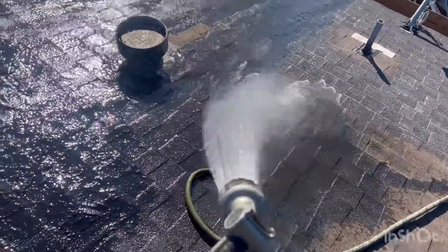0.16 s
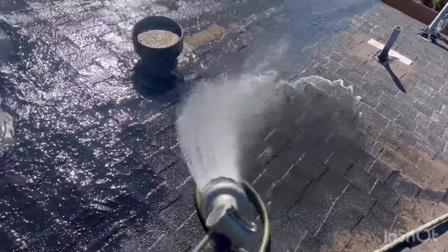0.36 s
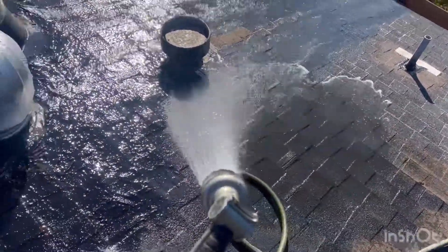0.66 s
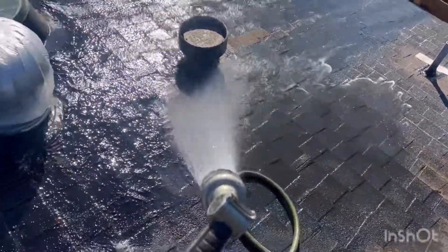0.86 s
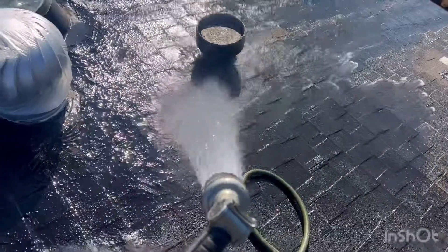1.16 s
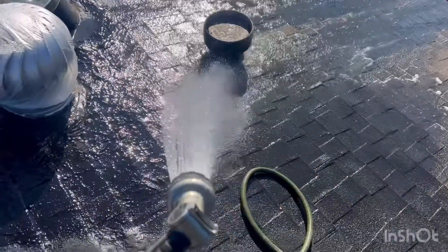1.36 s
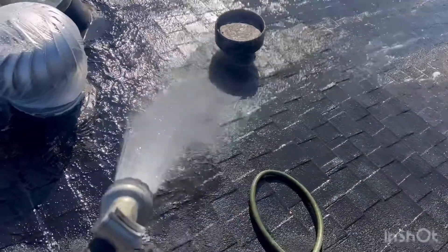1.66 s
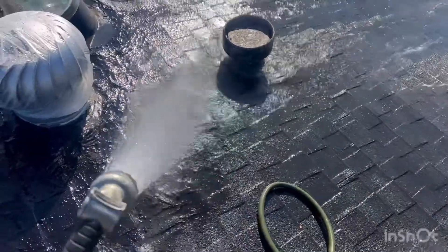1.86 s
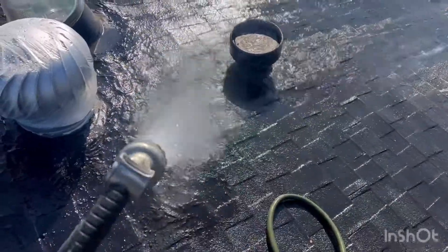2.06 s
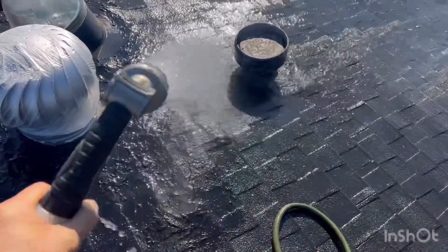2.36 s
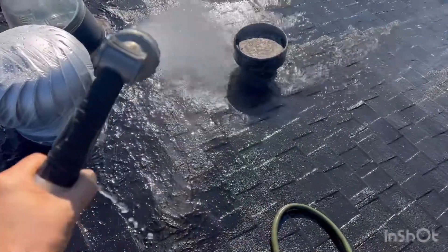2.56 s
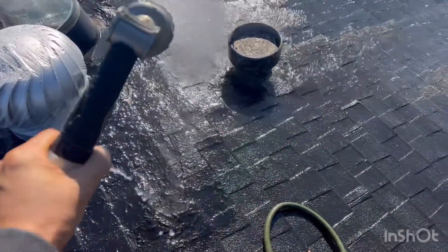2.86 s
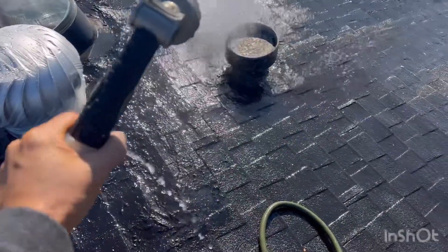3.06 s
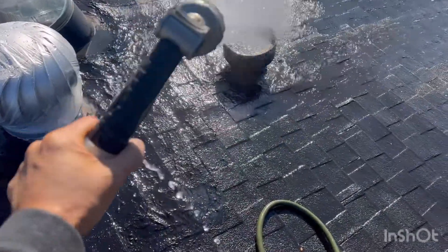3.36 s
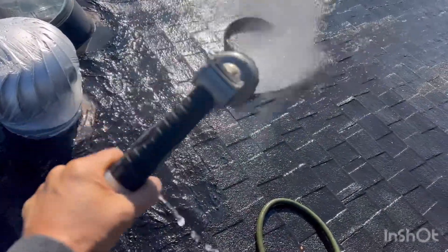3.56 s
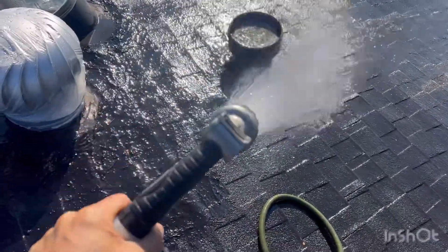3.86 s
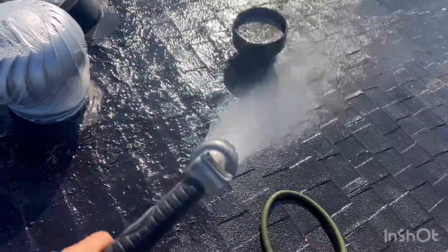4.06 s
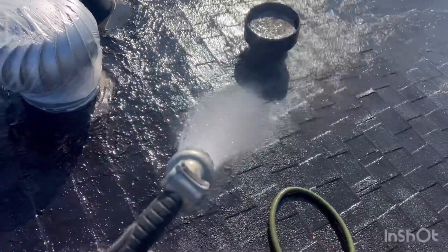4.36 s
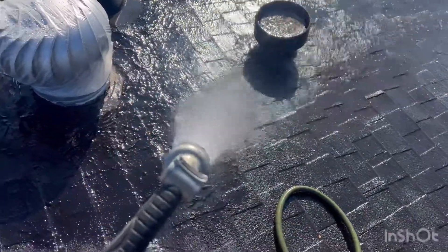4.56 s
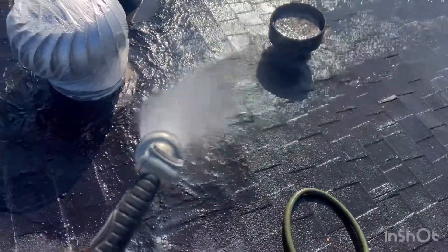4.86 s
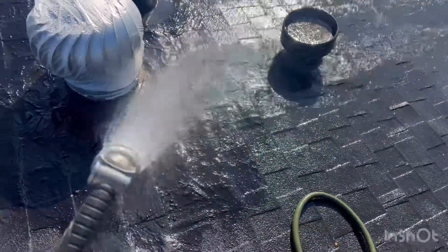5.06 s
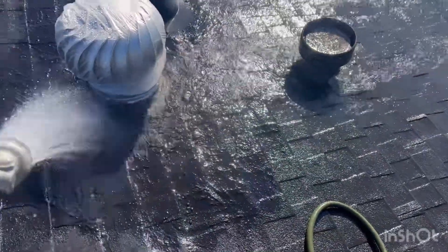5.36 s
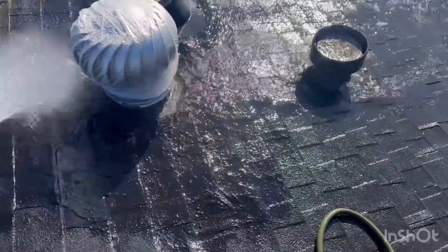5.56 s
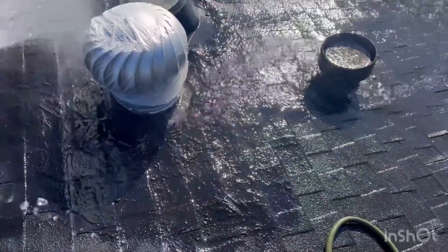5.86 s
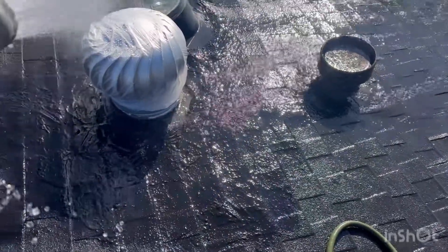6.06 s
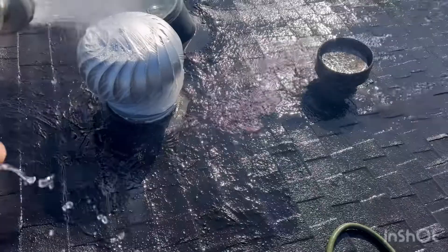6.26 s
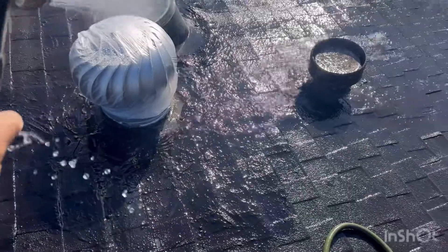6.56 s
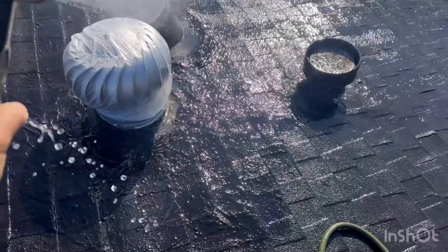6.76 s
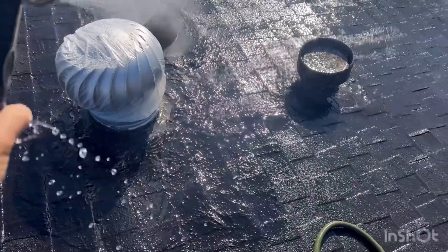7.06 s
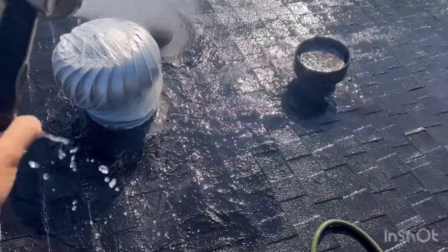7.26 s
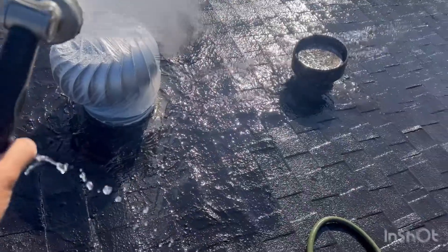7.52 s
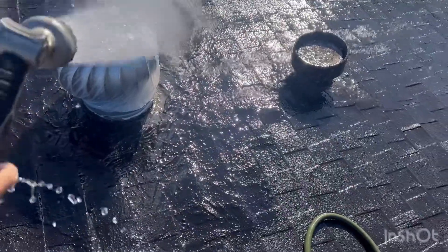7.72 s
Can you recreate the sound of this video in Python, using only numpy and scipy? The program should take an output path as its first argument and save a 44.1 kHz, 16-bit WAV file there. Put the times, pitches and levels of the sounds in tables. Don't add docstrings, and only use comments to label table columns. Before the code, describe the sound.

Continuous pressurized water hiss and splatter on wet roof shingles outdoors, with stray drop ticks, faint low hum, and a much louder close finish.

```python
import sys
import numpy as np
from scipy import signal
from scipy.fft import rfft, irfft
from scipy.io import wavfile
from scipy.ndimage import uniform_filter1d, map_coordinates

SR = 44100
rng = np.random.default_rng(int(sys.argv[2]) if len(sys.argv) > 2 else 0)


def log_audio(samples):
    frames = np.atleast_2d(samples).T
    limited = np.clip(frames, -1, 1)
    pcm = np.round(limited * 32767).astype(np.int16)
    wavfile.write(sys.argv[1], SR, pcm)


def gain_from_db(level_db):
    decades = np.asarray(level_db, float) / 20
    return 10 ** decades


N = 347949
FRAME, HOP = 1024, 256
HZ = np.arange(FRAME // 2 + 1) * SR / FRAME + 1

# t/s, share heard from the left (0-1), stretch of the port lead for spray ahead (1 =
SPRAY_AIM = [(0, 0, 0.24), (.3, 0, 1.17), (1.2, 0.08, 1.26), (2, 0.15, 1.3), (2.3, 0.54, 0.28),
             (2.55, 0.24, 0.29), (2.85, 0.5, 1.1), (3.2, 0.25, 0.64), (3.6, 0, 0.64), (4.05, 0.12, 0.12),
             (4.3, 0, 1), (4.8, 0.16, 1.45), (5.1, 0.4, 1.8), (5.4, 0.95, 2.3), (6.2, 0.85, 4.3),
             (7.3, 0.84, 2.2), (7.6, 1, 1.5), (7.89, 1, 1.4)]


def columns(table, s):
    t, *rest = np.transpose(table)
    return [np.interp(s, t, c) for c in rest]


def shape(table, hz):
    f, *rest = np.transpose(table)
    return [np.interp(np.log(hz), np.log(f), c) for c in rest]


def swells(rows, s):
    return sum(db * np.exp(-((s - at) / half_s) ** 2) for at, db, half_s in rows)


def walk(rate, size=N, step=1):
    hold = max(int(SR / step / rate), 1)
    levels = np.repeat(rng.standard_normal(size // hold + 1), hold)
    smooth = uniform_filter1d(uniform_filter1d(levels, hold), hold)[:size]
    return smooth / np.std(smooth)


def frames(x):
    return signal.stft(x, nperseg=FRAME, noverlap=FRAME - HOP)[2]


def colour(db):
    gain = gain_from_db(db)
    return (gain / np.sqrt(np.mean(gain ** 2)))[:, None]


def hose():
    # f/Hz, width/Hz, level/dB
    metal = [(630, 270, -5), (1557, 89, 7.5), (2080, 250, 5.5), (2240, 91, -5), (3310, 400, 2.5),
             (4000, 180, -2.5), (4600, 420, 2), (5930, 600, 4.5), (6350, 200, 1.5), (7460, 830, 3.5),
             (7950, 220, -2.5)]
    # f/Hz, left leads/rad, likeness (0-1), left minus right/dB
    ports_ahead = [(50, -0.7, 1, 10), (520, -1.14, 0.44, -1.5), (1310, 0.17, 0.9, -2),
                   (2330, 0.71, 0.64, -3.5), (2770, 1.87, 0.8, -1), (4000, 1.28, 0.57, 2),
                   (5000, 0.94, 0.8, 3), (6000, 1.05, 1, 2.5), (7300, 1.4, 0.62, 1)]
    # f/Hz, left leads/rad, likeness (0-1), left minus right/dB
    ports_left = [(50, 0, 1, 1.5), (600.2, 0.26, 0.93, 2), (1490, 1.43, 1, -1.5), (1950, 1.46, 1, -5),
                  (2600, 3, 0.69, 1.5), (2900, 3, 0.85, 7), (3200, 5.5, 0.39, 17), (4000, 8.5, 1, 5),
                  (4600, 5.5, 0.98, 18), (5300, 5.5, 0.94, 13), (6300, 5, 0.99, 0.5), (7440, 7, 0.8, 1.5)]
    # t/s, stretch of the port lag to the left (1 = none)
    twists = [(4.8, .85), (5.25, 1), (5.5, 1.45), (6.1, 1.4), (6.4, 1.05), (7, 1.02), (7.3, .98), (7.89, 1)]
    ahead = drops(1400, 1.0, 0.31)
    left = drops(1500, 1.5, 0.18)
    tick = ticks()
    count = tick.shape[1]
    s = np.arange(count) * HOP / SR
    gain = spray_gain(count)
    aim, turn = columns(SPRAY_AIM, s)
    aim = np.clip(aim, 0, 1)
    twist = columns(twists, s)[0]
    metal_db = sum(db / (1 + ((HZ - hz) / width * 2) ** 2) for hz, width, db in metal)
    ahead = gain * np.sqrt(1 - aim) * ahead
    left = gain * np.sqrt(aim) * left * gain_from_db(metal_db - 1.5)[:, None]
    ahead[0] += tick
    heard = ports(ports_ahead, *ahead, turn, 6000)
    heard = heard + ports(ports_left, *left, twist, 4000, turns=1)
    return signal.istft(heard, nperseg=FRAME, noverlap=FRAME - HOP)[1][:, :N]


def drops(rate, scatter_db, share):
    size = gain_from_db(np.minimum(scatter_db * rng.exponential(size=N), 9.0))
    impacts = size * (rng.random(N) < rate / SR)
    burst = signal.lfilter([1], [1, -.9], impacts)
    beat = np.sqrt(1 - share + share * burst ** 2 / np.mean(burst ** 2))
    beat *= gain_from_db(0.51 * walk(40) + 0.36 * walk(26))
    noise = rng.standard_normal((2, N))
    treble = np.clip((HZ[:, None] - 1200) / 5000, 0, 1)
    return (1 - treble) * frames(noise) + treble * frames(beat * noise)


def nozzle(s):
    # t/s, nearness/dB, half length/s
    flicks = [(.15, -0.5, 0.059), (1.48, 3, 0.038), (1.66, -2, 0.092), (2.02, -3, 0.18), (2.38, 2.5, .13),
              (2.9, -1, 0.2), (3.3, -1.5, 0.14), (3.75, -3.5, 0.13), (4.1, 0, 0.28), (5.24, 2, 0.035),
              (5.38, 5, 0.071), (5.69, 7, 0.11), (5.96, -2.5, 0.053), (6.19, 5, 0.087), (6.4, 3.5, .14),
              (6.75, 3.5, 0.11), (7.05, -2, 0.13)]
    # t/s, how far the nozzle points away (0-1)
    pointing = [(0, .3), (1.4, 0.23), (2.3, 0.17), (3.3, 0.6), (3.8, 0.4), (4.3, 0.2), (5.45, 0),
                (5.6, 0.5), (6.6, 1), (7.15, 1), (7.5, 0.8), (7.89, 0.7)]
    # t/s, rise/dB, half length/s
    pipe_passes = [
        (.6, 0, 0.28),
        (2.1, 4, .1),
        (3.3, 3.5, 0.8),
        (4.5, 2, .35),
        (5.45, -24, 0.099),
        (5.7, 3, 0.17),
        (6.5, 4, 0.44),
    ]
    near_db = swells(flicks, s) + np.clip((s - 7.191) * 35, 0, 23)
    away = columns(pointing, s)[0]

    def layer_db(rest_db, follow, away_db):
        return rest_db + follow * near_db + away_db * away

    jet_db = layer_db(-39, 0.92, -1.4)
    mist_db = layer_db(-44.5, 0.79, -7.5)
    splash_db = layer_db(-47, 0.88, 3.7)
    pipe_db = layer_db(-50, 0.2, 2.5) + swells(pipe_passes, s)
    return jet_db, mist_db, splash_db, pipe_db


def spray_gain(count):
    # f/Hz, level/dB
    jet = [(2500, -7), (4000, -15.5), (6000, -8), (7500, -4.5), (8300, -2),
           (9000, 0), (9600, -.5), (10200, -5), (10900, -12), (11800, -22)]
    # f/Hz, level/dB
    mist = [(10300, -20), (11300, -8), (12300, -7.5), (13200, -6), (14000, -2.5), (15500, 1), (15720, 1),
            (15800, -40)]
    # f/Hz, level/dB
    splash = [(120, 3.5), (250, -1), (450, 4), (800, 2.5), (1500, 3), (2000, 2.5), (2350, 3.5), (3100, -1),
              (4000, 2), (5500, -3), (8000, -37)]
    pipe_hz, pipe_width_hz = 1361, 240

    def closed(table):
        outside = (HZ < table[0][0]) | (HZ > table[-1][0])
        return np.where(outside, -60, shape(table, HZ)[0])

    jet_db, mist_db, splash_db, pipe_db = nozzle(np.arange(count) * HOP / SR)
    ring_db = -20 * np.log10(1 + ((HZ - pipe_hz) / pipe_width_hz * 2) ** 2)
    power = (colour(closed(jet)) * gain_from_db(jet_db + 0.9)) ** 2
    power += (colour(closed(mist)) * gain_from_db(mist_db + 1.7)) ** 2
    power += (colour(closed(splash)) * gain_from_db(splash_db + 1.5)) ** 2
    power += (colour(ring_db) * gain_from_db(pipe_db - 1.5)) ** 2

    patches = np.array([walk(22, size=count, step=HOP) for _ in range(12)])
    band = np.clip(np.sqrt(HZ / 16000), 0, 1) * 11
    place = np.meshgrid(band, np.arange(count), indexing="ij")
    depth_db = .5 * np.clip(HZ / 6000, .2, 1.5)[:, None]
    patchy_db = depth_db * map_coordinates(patches, place, order=1)

    ripple = uniform_filter1d(rng.standard_normal((len(HZ), count)), size=120, axis=1)
    ripple = uniform_filter1d(ripple, size=3, axis=0)
    ripple_db = 1.5 * np.clip(ripple / np.std(ripple), -2, 2) * np.clip(HZ / 3000, 0, 1)[:, None]
    return gain_from_db(ripple_db) * np.sqrt(power) * gain_from_db(patchy_db)


def ports(table, direct, diffuse, turn, top_hz, turns=0):
    # f/Hz, left leads/rad, likeness (0-1), left
    # minus right/dB
    ports_treble = [(8500, 0, .97, 0), (9500, -2, .97, 0), (9750, -2.85, .99, 0), (10300, -3.14, .99, 0),
                    (10900, -3.35, .99, 0), (11200, -4.8, .98, 0), (11600, -6.1, .99, 0),
                    (12400, -6.6, .97, 0), (13150, -9, .98, 0), (14200, -9.8, .98, 0),
                    (15200, -12.3, .99, 0), (15800, -12.6, .99, 0)]
    treble = [(f, lead + 2 * np.pi * turns, like, pan) for f, lead, like, pan in ports_treble]
    hz, *rest = np.transpose(table + treble)
    lead, like, pan_db = (np.interp(HZ, hz, c)[:, None] for c in rest)
    like = np.clip(like, 0, 1)
    turnable = np.interp(HZ, [1000, 1800, top_hz - 700, top_hz], [0, 1, 1, 0])[:, None]
    lead = lead * turnable * (turn - 1) + lead
    right = like * direct * np.exp(-1j * lead) + np.sqrt(1 - like ** 2) * diffuse
    both = np.array([direct * gain_from_db(pan_db / 2), right * gain_from_db(-pan_db / 2)])
    return both / np.sqrt(np.cosh(pan_db * np.log(10) / 20))


def ticks():
    # t/s, peak level/dB, ring f/Hz, upper ring f/Hz, time to fall 60 dB/s
    stray_drops = [(.3047, -21, 6500, 8600, .003), (1.5537, -10, 5800, 7100, 0.0025),
                   (1.6152, -18, 6000, 8600, .002), (2.0667, -21.5, 920, 1790, 0.0036),
                   (2.5008, -24.5, 795, 1600, 0.0036), (3.686, -19, 2540, 3350, 0.0086),
                   (4.282, -9, 6000, 7400, 0.0045), (4.6572, -25, 7300, 8450, 0.0048),
                   (5.176, -28, 4800, 5584, 0.0036), (5.394, -25, 4000, 4900, .004),
                   (5.535, -20, 3000, 7000, 0.0031), (5.5359, -19.5, 4000, 4600, 0.0052),
                   (7.008, -17, 3600, 5000, 0.003), (3.175, -40, 900, 1700, 0.0035),
                   (7.118, -25, 7000, 8330, 0.0037)]
    upper_share = .6
    out, t = np.zeros(N + 600), np.arange(600) / SR
    for s, db, hz, upper_hz, t60 in stray_drops:
        ring = (1 - upper_share) * np.sin(2 * np.pi * hz * t)
        ring += upper_share * np.sin(2 * np.pi * upper_hz * t)
        envelope = (1 - np.exp(-t / 0.000084)) * np.exp(-np.log(1000) * t / t60)
        out[int(s * SR):][:600] += 2 * gain_from_db(db) * ring * envelope
    return frames(out[:N])


def machine(hz, multiples, dbs, waver_hz, waver_db):
    turn = 2 * np.pi * np.cumsum(hz + waver_hz * walk(6)) / SR
    tones = [np.sqrt(2) * gain_from_db(db + waver_db * walk(5)) * np.sin(k * turn) for k, db in zip(multiples, dbs)]
    return sum(tones)


def fan(s):
    spells = {3: (-57.5, [(0.22, 8, 0.62), (2.22, 4.5, 0.28), (3.9, 5.5, 0.85), (6.1, 1, 0.36),
              (7.35, 11, 0.51)]), 6: (-63, [(.6, 12, .4), (1.7, 10, .35), (3.9, 13, 1.2), (6.4, 5, .5),
              (7.8, 10, .3)]), 8: (-66.5, [(0.39, 13, 0.99), (4.6, 7, 1), (6, 3, .3), (8.9, 12, .2)]),
              9: (-65.5, [(.3, 10.5, 0.85), (3.1, 7, .35), (4.5, 8.5, 0.45), (6.25, 12, .12),
              (6.7, 8, 0.57), (7.7, 18, 0.23)])}
    fan_dbs = [db + swells(rows, s) for db, rows in spells.values()]
    shaft_hz = 41.2 - .24 * s
    return machine(shaft_hz, spells, fan_dbs, waver_hz=.08, waver_db=1.2)


def pump(s):
    drone_hz, beat_hz = 78, 9.2
    pump_db = -59 + 10 * columns(SPRAY_AIM, s)[0]
    return sum(machine(hz, (1,), [pump_db], 2.504, 1.0) for hz in (drone_hz, drone_hz + beat_hz))


def wind_rumble(s):
    # f/Hz, level/dB
    rumble = [(20, -32), (33, -22), (50, 0), (80, -2.5), (130, -3), (200, -8), (400, -8), (700, -23)]
    # t/s, change/dB, half length/s
    lulls = [
        (1.7, -2, 0.092),
        (2.8, -3, 0.29),
        (4.65, -4.5, .08),
        (5.3, -3, .3),
    ]
    hz = np.arange(N // 2 + 1) * SR / N + 1
    gain = gain_from_db(shape(rumble, hz)[0]) * (hz < 900)
    mid, side = irfft(rfft(rng.standard_normal((2, N))) * gain, N)
    level = gain_from_db(-48 + 1.24 * walk(9) + swells(lulls, s)) / np.std(mid)
    return level * (mid * gain_from_db([[.7], [-.7]]) + 0.37 * side * np.array([[1], [-1]]))


def gust_thumps(s):
    # t/s, rise/dB, half length/s
    gusts = [(.2, 9, .08), (1.05, 14, 0.089), (1.3, 16, 0.18), (1.8, 11, 0.11), (2.28, 18, 0.074),
             (2.48, 15.5, .06), (4.15, 17, 0.088), (4.5, 9, 0.055), (5.5, 7, .15), (6.4, 8, 0.33),
             (7.1, 13, .1)]
    band = signal.butter(2, (44.6, 95), "bandpass", fs=SR, output="sos")
    mid, side = signal.sosfilt(band, rng.standard_normal((2, N)))
    level = gain_from_db(-62.5 + swells(gusts, s) + 3.0 * walk(25)) / np.std(mid)
    return level * (mid + .3 * side * np.array([[1], [-1]]))


def scene():
    s = np.arange(N) / SR
    machines = (fan(s) + pump(s)) * gain_from_db([[.9], [-.9]])
    return hose() + machines + wind_rumble(s) + gust_thumps(s)


def low_pass(x):
    return signal.sosfilt(signal.butter(12, 15990, fs=SR, output="sos"), x)


def record(dry):
    return low_pass(dry)


dry = scene()
out = record(dry)
log_audio(out)
```